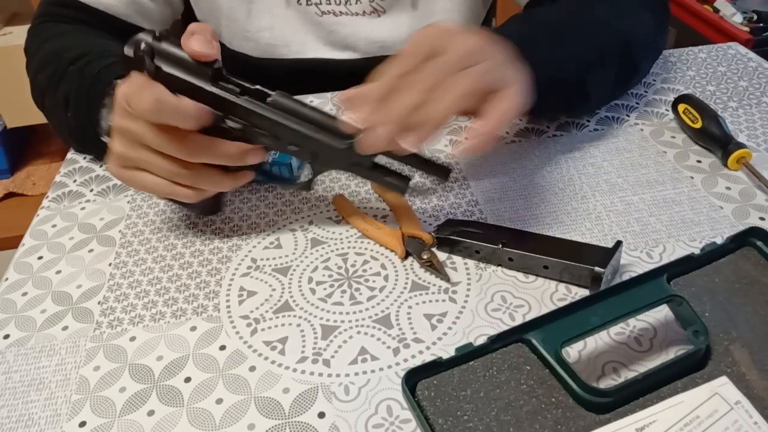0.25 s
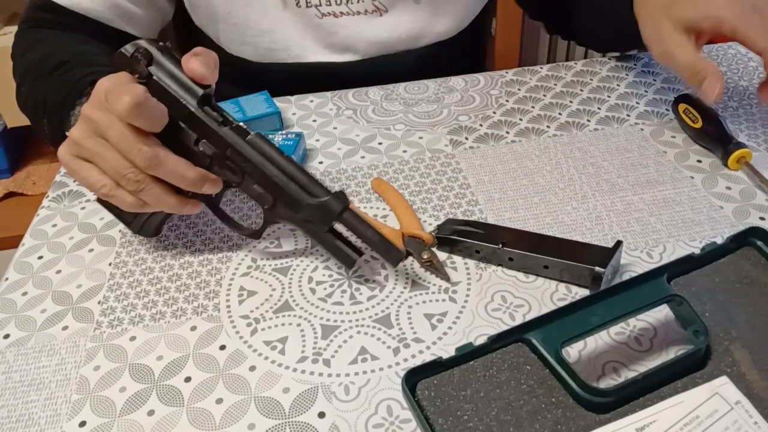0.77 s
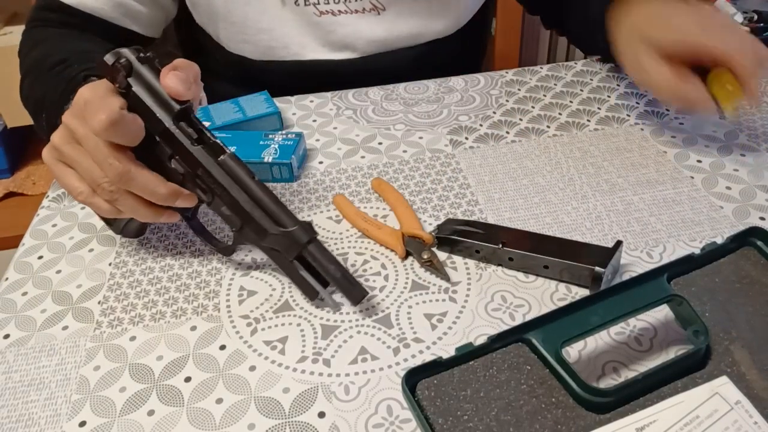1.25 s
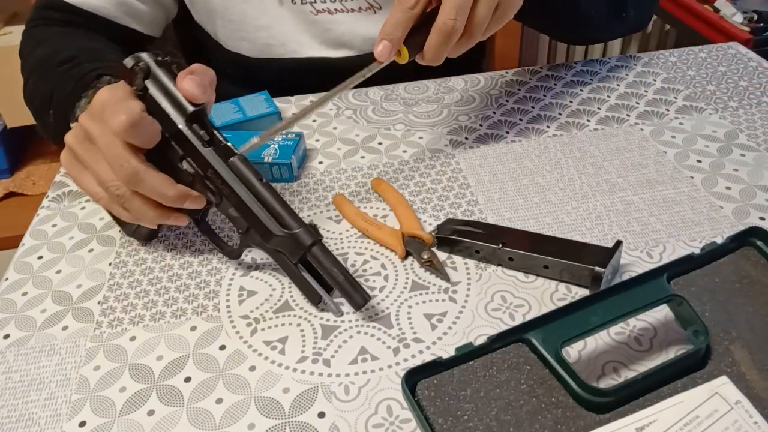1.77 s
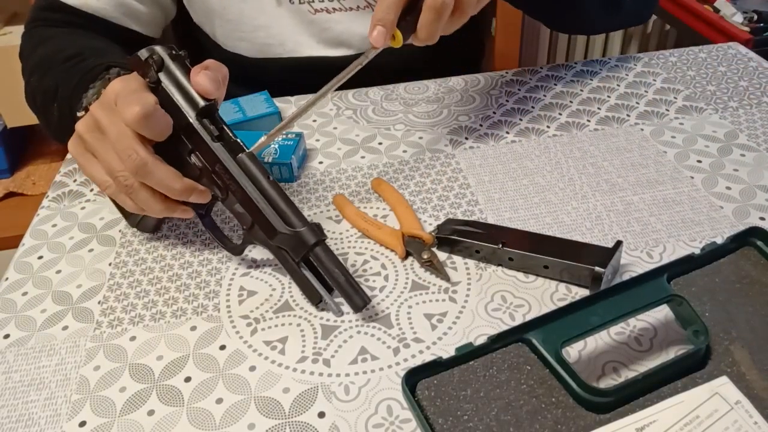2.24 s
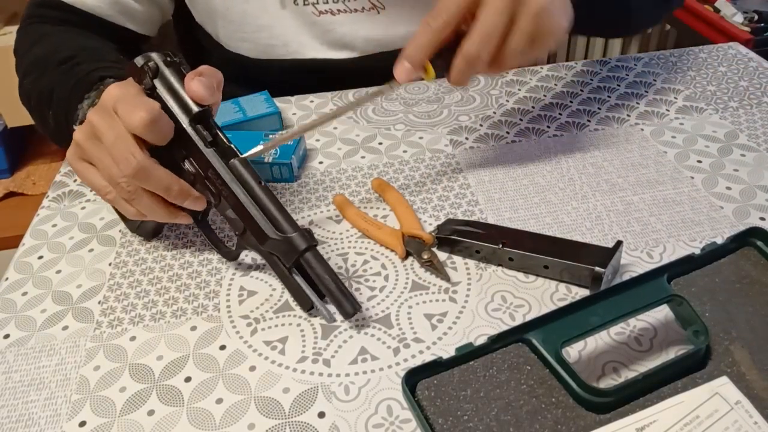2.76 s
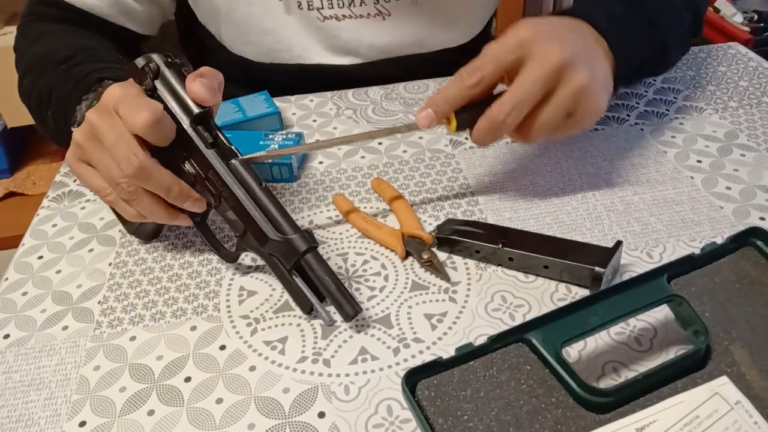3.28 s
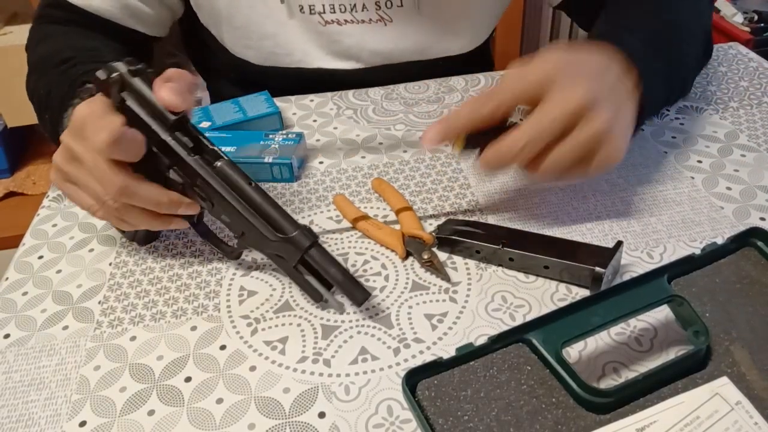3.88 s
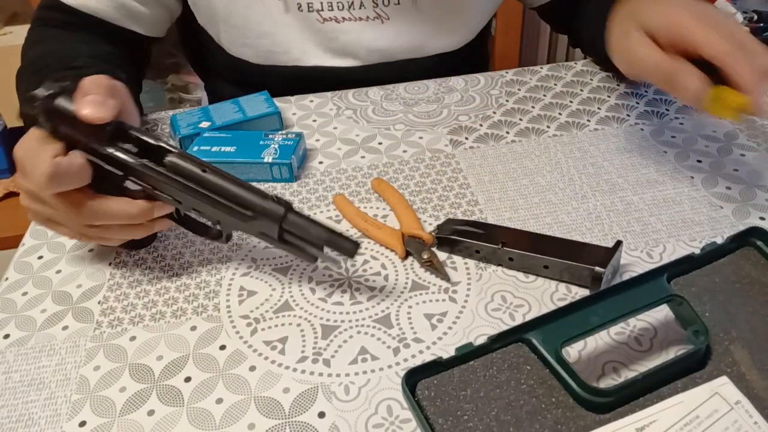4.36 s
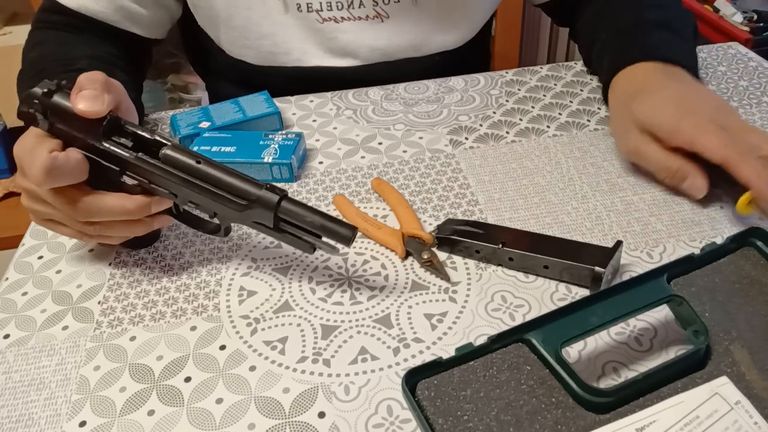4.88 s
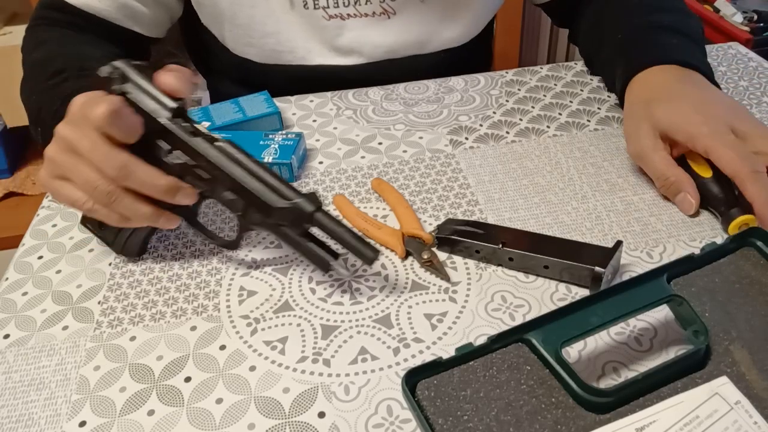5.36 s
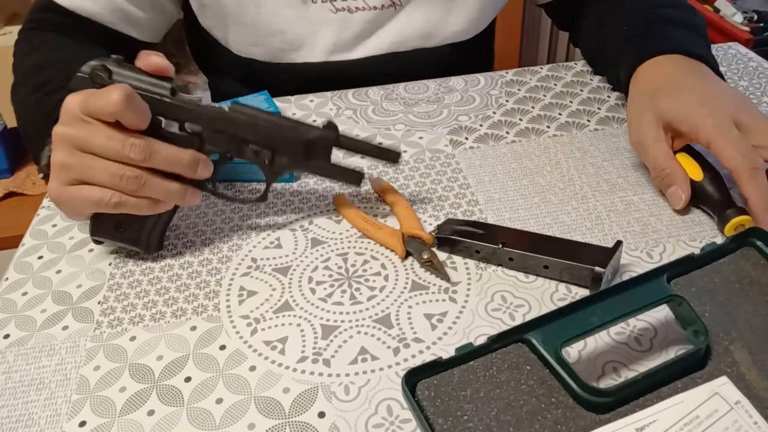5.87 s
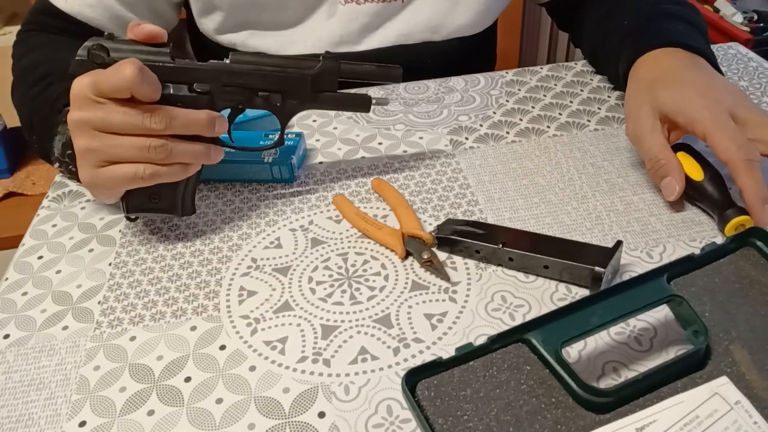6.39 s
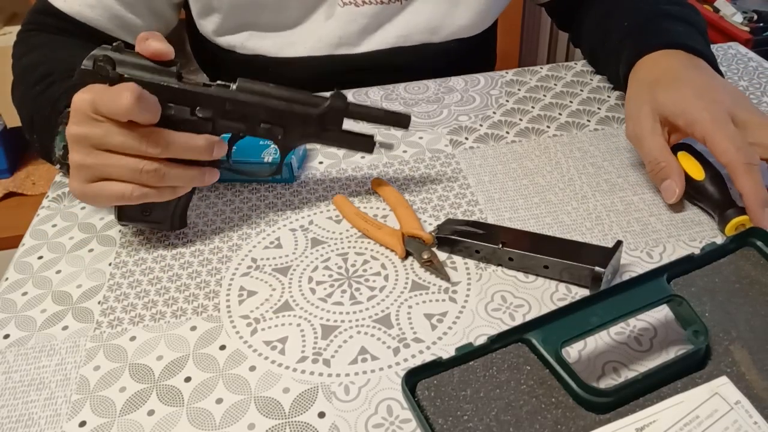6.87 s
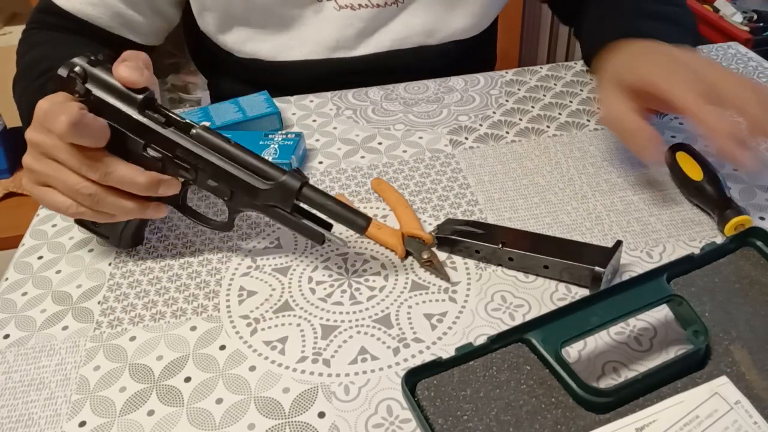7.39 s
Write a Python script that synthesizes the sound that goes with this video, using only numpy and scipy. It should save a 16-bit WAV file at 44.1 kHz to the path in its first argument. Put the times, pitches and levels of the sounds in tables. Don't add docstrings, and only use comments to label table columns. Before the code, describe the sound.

In a small quiet room, a screwdriver ticks and pries at a steel pistol, then a loud metallic clack, loose rattle and thud on a table.

```python
import sys
import numpy as np
from scipy import signal
from scipy.fft import rfft, irfft
from scipy.io import wavfile
from scipy.ndimage import uniform_filter1d

SR = 44100
rng = np.random.default_rng(int(sys.argv[2]) if len(sys.argv) > 2 else 0)


def to_linear_factor(level_db):
    exponent = np.asarray(level_db, float) / 20
    return 10 ** exponent


def dump(signal):
    limited = np.clip(np.atleast_2d(signal).T, -1, 1)
    pcm = np.round(limited * 32767).astype(np.int16)
    wavfile.write(sys.argv[1], SR, pcm)


N = 336483

# frequency in Hz, left-right likeness of diffuse sound from 0 to 1.
LIKENESS = [(60, 1), (120, 0.85), (240, 0.75), (480, .48), (950, 0.025), (1900, 0.0032)]
# frequency in Hz, time for the room tail to fall 60 dB in seconds.
ROOM_T60 = [(100, 1), (300, 0.36), (1000, 0.35), (3000, 0.31), (6000, 0.3), (7800, 0.34), (10000, 0.12)]
# mode frequency in Hz, width in Hz.
RUMBLE_MODES = [(88, 13), (132, 14)]

# frequency in Hz, level in dB per Hz.
AIR_TONE = [(15, -70), (28, -43), (45, -19.5), (100, -0.5), (300, -6.5), (450, -10), (800, -12.5),
            (1500, -18), (2300, -17), (4200, -34), (5600, -40), (6800, -34.5), (8000, -53), (15500, -46.5)]
RUSTLE_TONE = [(2500, -14), (3500, -3.5), (5000, -6), (6600, 2), (7300, -2), (8060, -22), (10500, -42.5)]
STIR_TONE = [(150, -10.5), (300, 1.5), (700, 6.5), (1300, -3.5), (3000, -36.5)]
SCUFF_TONE = [(700, -18.5), (1500, 1.5), (2300, 1.5), (3300, -11), (4500, -18.5), (8000, -46)]

# start in seconds, length in seconds, level in dB.
LOW_SWELLS = [(.4, 0.55, -79), (1.15, 0.71, -75.5), (2.2, 0.63, -71.5), (2.9, 1.04, -69), (4.9, .55, -71),
              (7.1, 0.37, -80.5)]
HIGH_SWELLS = [(.7, 0.49, -74.5), (1.7, 0.72, -71.5), (2.8, 0.18, -72), (3.702, .55, -71), (5, 0.51, -62.5),
               (5.6, 0.69, -77), (6.42, .8, -66.5), (7.42, 0.43, -66.5)]
RUSTLES = [(-.1, 0.49, -100.5), (0.392, 0.46, -84), (1.1, 0.53, -94.5), (2.55, 0.33, -99),
           (4.202, 0.34, -83.5), (5.2, .9, -101.5), (5.2, 2.6, -95.5), (7.51, 0.28, -89.5)]
STIRS = [(.3, 0.65, -69.5), (1.05, 1, -67), (2.5, 0.73, -71), (4.2, 0.38, -76), (4.95, 0.63, -58.5),
         (5.7, 0.81, -70), (6.95, 0.61, -64.5), (7.4, 0.48, -67)]
SCUFFS = [(1.1, 0.66, -66), (3.6, 0.63, -80), (6, 0.26, -67), (6.8, 1.4, -76)]
MOANS = [
    (6.45, 0.27, -76.5),
    (6.75, 0.36, -68.5),
]

# start in seconds, peak in dB, left-right balance in dB, contact in ms, room level in dB.
LATCH = [
    (.001, -44.5, 2.2, 3.6, 1.9),
]
HANDLE = [
    (1.1905, -45.5, 1.1, 4.34, 2.5),
    (1.218, -55, 3.7, 8, -10),
]
TIP = [
    (1.8701, -28, 1.8, 1.63, -6.5),
    (1.8916, -39, 2.0, 1.5, -12),
    (1.9034, -35.5, 0.5, 1.8, -8),
    (1.884, -46, 1.5, 2.1, -10),
    (1.9095, -45.5, 1.5, 2.4, -9),
]
GRIP = [
    (1.9075, -42, -1, 3.63, -2.5),
]
SHAFT = [
    (1.9621, -31, 3.1, 1.24, -6),
    (1.9734, -51, 2.5, 1.1, -6),
    (1.9844, -51, 1.5, 1.5, -7),
]
ELBOW = [
    (1.972, -52, 4.1, 4.3, -9.5),
    (2.888, -45.5, 2.4, 9, -4.5),
    (4.545, -57.5, 2.4, 5.1, -2),
]
TOUCH = [
    (2.1779, -43.5, 10, 1, -7.5),
]
SLIP = [
    (3.8415, -49, 3, 0.49, -15),
]
SEAT = [
    (3.9485, -52.5, 2, 3.8, 1.9),
]
PRY = [
    (3.957, -34, 0.74, 1.793, -6.5),
]
PIN = [
    (3.964, -57, 4, 1.5, -5),
    (3.9748, -53, 4, 1.5, -5),
    (3.9812, -40, 6.9, 2.004, -11),
]
NUDGE = [
    (4.993, -24, 11, 1.9, -5.5),
    (5.015, -44.5, 6, 2.2, -9),
]
CLACK = [
    (5.1, -8.5, 4.5, 1.8, -6),
]
RATTLE = [(5.111, -24.5, 5, 3.3, -2), (5.121, -24, 10, 2.6, -10.5), (5.131, -25, 1, 1.2, -5.5),
          (5.139, -29.5, 0.5, 1.3, -4.5), (5.158, -19, -2, 2.36, -7.5), (5.167, -32.5, 10, 2.7, 2.5),
          (5.18, -23.5, 4.5, 1.52, 0), (5.188, -32, 9, 1.5, -5), (5.198, -28, 4, 1.44, -9)]
THUD = [
    (5.2642, -12.5, 1.4, 1.38, -6),
    (5.27, -21, 1.5, 2.9, -10),
    (5.28, -23, 1.0, 1.1, -9),
    (5.286, -27.5, 1.02, 4.3, -3),
]
LEVER = [
    (6.017, -28, -0.44, 1.2, -4),
]

# start in seconds, peak in dB, contact in ms.
BUMPS = [(0.95, -68, 11), (3.318, -61, 5.1), (3.818, -62, 9.4), (4.309, -67.5, 37), (4.788, -62, 12),
         (5.799, -59, 15), (5.839, -66, 11), (6.235, -60, 20), (6.277, -57.5, 28), (6.44, -57.5, 14),
         (7.589, -67.5, 19)]
SCRAPES = [
    (1.197, -59, 4.6),
    (1.212, -64, 42),
    (1.262, -68, 57),
    (3.575, -74.5, 29),
]
# start in seconds, peak in dB.
TICKS = [(0.2735, -74), (1.1817, -68), (2.604, -69.5), (2.6243, -71), (2.6504, -63), (2.7195, -72),
         (2.8799, -74), (2.974, -69), (5.4396, -71), (5.455, -67), (5.567, -69)]
# first slip in seconds, last slip in seconds, peak in dB.
CREEPS = [(5.622, 5.732, -74), (5.8533, 5.9065, -71), (6.1945, 6.2567, -74), (6.6153, 6.864, -71.5),
          (6.9812, 7.1079, -73)]
# start in seconds, pitch in Hz, level in dB, length in ms.
SQUEAKS = [
    (6.383, 3124, -55, 6),
    (6.443, 2882, -48.5, 8.7),
]
# level in dB of the squeak's successive harmonics, the fundamental first.
SQUEAK_OVERTONES_DB = [0.5, -12.5, -32.5]

# frequency in Hz, level in dB per Hz.
LATCH_TONE = [(710, -52), (1200, -44.5), (1520, -19), (1860, -21), (2150, -7.5), (2500, -10), (3020, -3),
              (3280, -6.5), (4920, -13), (6660, -7.5), (8060, -26), (10500, -25), (17700, -120)]
TICK_TONE = [(2500, -25), (4800, -7), (6000, -2.5), (6900, 13.5), (7600, -10), (8600, -15.5),
             (12000, -50.5)]
BUMP_TONE = [(100, -18), (220, 0.5), (330, 0), (550, -1), (900, -14.5), (2000, -40), (4000, -61.5)]
HANDLE_TONE = [(60, -29), (100, -6), (240, -10), (340, -0.5), (460, 1.5), (650, -7), (820, -2.5),
               (1280, -12.5), (2200, -26), (4000, -61)]
SCRAPE_TONE = [(1200, -23), (2200, 6), (3300, 0.5), (5000, -5.5), (6700, -0.5), (7600, -9), (8300, -26)]
TIP_TONE = [(410, -13), (700, -12), (895, -28), (1850, -8.5), (2130, -11), (2730, -5.5), (3210, -16),
            (3450, -5.5), (3710, -10.5), (6240, -9.5), (6840, -13), (8060, -27), (10500, -62),
            (17700, -120)]
GRIP_TONE = [(120, -37), (300, -27), (570, -2.5), (680, -6), (790, -3), (1160, -17), (1900, -13),
             (3200, -25), (5000, -67)]
SHAFT_TONE = [(710, -25), (1200, -15), (1650, -11), (2060, -1.5), (2480, -11), (2640, -6.5), (3170, -10.5),
              (3780, 0), (4160, -14), (4610, -0.5), (5040, -9), (5540, 0.5), (5910, -16), (6400, 3),
              (8060, -27.5), (10500, -32), (17700, -120)]
ELBOW_TONE = [(24, -47.5), (45, -18), (110, -6), (175, 2), (275, -13.5), (370, -12), (500, -31.5),
              (900, -65)]
TOUCH_TONE = [(880, -49), (1500, -19), (2270, 2), (2580, -18), (2810, -5), (4300, -4), (5030, 1),
              (5790, -6), (7000, 1), (8060, -37), (10500, -61), (17700, -120)]
SEAT_TONE = [(300, -24), (700, -10), (900, 11), (1150, -15), (2500, -59)]
PRY_TONE = [(100, -5), (200, -0.5), (550, -1.5), (1100, -4.5), (1800, -3.5), (2700, -8.5), (3300, -12),
            (3700, -11), (4100, -13.5), (4700, -23), (6800, -22), (8100, -29), (10000, -69)]
PIN_TONE = [(470, -25), (800, -5), (1250, -27), (1500, -6), (2690, -8), (3900, -19), (4600, -7.5),
            (5340, -9), (5820, -21), (6350, -7), (8000, -33), (10400, -60), (17600, -120)]
NUDGE_TONE = [(47, -34.5), (80, -11), (315, -7), (520, -8.5), (573, -16), (668, -9), (965, 0), (1310, -9),
              (1530, -5.5), (3070, -14.5), (5070, -31), (6520, -28.5), (8060, -53), (10500, -87),
              (17700, -120)]
CLACK_TONE = [(47, -51.5), (80, -23.5), (231, -10), (530, -21.5), (751, -7), (1170, -9.5), (1340, -16),
              (1720, -3.5), (2580, -12), (3190, -21.5), (3510, -14.5), (4350, -28), (6520, -20),
              (7610, -36), (8060, -65.5), (10500, -99), (17700, -120)]
RATTLE_TONE = [(80, -24), (231, -9), (530, -19), (780, -2.5), (1300, -13), (1800, -5.5), (2600, -11.5),
               (3200, -23.5), (3700, -19), (4400, -33.5), (6500, -32), (7600, -41.5), (8060, -66),
               (10500, -99)]
THUD_TONE = [(24, -52.5), (40, -27), (86, -15), (140, -22), (232, -3), (344, -12.5), (431, -1.5), (638, -7),
             (783, -1), (981, -4.5), (1180, -5), (1600, -13), (3500, -41), (4550, -78), (7700, -120)]
LEVER_TONE = [(88, -33), (150, -25), (307, -2.5), (415, -11), (466, -6), (863, -3.5), (1110, -10),
              (1250, -5), (1650, -10), (2350, -3), (6490, -14.5), (8060, -25), (10500, -64), (17700, -120)]

# frequency in Hz, width in Hz, level over the colour in dB.
TIP_RINGS = [(1700, 200, 2), (2720, 150, 5), (3430, 130, 4.4), (4400, 170, 4), (6960, 230, 3)]
SHAFT_RINGS = [(2710, 190, 10), (4640, 120, -1), (6570, 120, 7.5), (8200, 45, 8)]
TOUCH_RINGS = [(1870, 90, 5), (2310, 100, 5), (4150, 93, 5), (5000, 160, 6.8)]
PRY_RINGS = [(484, 180, 1.8), (1840, 100, 4), (3240, 180, 6), (4100, 190, 6.6)]
PIN_RINGS = [(4560, 150, 4), (6380, 150, 4.9)]
NUDGE_RINGS = [(958, 92, 3), (1500, 98, 4), (2580, 81, 2), (3020, 110, 2)]
CLACK_RINGS = [(785, 50, 1), (974, 70, 3.5), (1760, 54, 6.5), (2000, 110, 2.5), (2540, 70, 0.5),
               (2810, 140, 5.5), (3610, 180, -0.5), (5400, 280, -1)]
THUD_RINGS = [(464, 68, 3.3), (855, 45, 4), (1223, 56, 2), (1800, 90, 3)]
LEVER_RINGS = [(340, 64, 2.6), (780, 220, 3.4), (1960, 140, 6.3), (2600, 110, 4), (3950, 260, 4.9),
               (5100, 220, 2.1)]


def evened(x):
    return x / np.sqrt(np.mean(x ** 2) + 1e-20)


def read(points, hz):
    f, value = np.transpose(points)
    return np.interp(np.log(hz + 1), np.log(f + 1), value)


def add(mix, s, sound):
    part = mix[..., max(round(s * SR), 0):][..., :sound.shape[-1]]
    part += sound[..., :part.shape[-1]]


def pair(shape, hz):
    a, b, c, d = rng.standard_normal((*shape, 4)).T
    left, other = a + 1j * b, c + 1j * d
    same = np.clip(read(LIKENESS, hz), -1, 1)[:, None]
    return np.array([left, same * left + np.sqrt(1 - same ** 2) * other])


def noise(tone, patchy_db):
    hz, shape = np.fft.rfftfreq(1024, 1 / SR), (N // 256 + 5, 513)
    patches = uniform_filter1d(rng.standard_normal(shape), 10, 0)
    patches = evened(uniform_filter1d(patches, 10, 1)).T
    patches = patches * (hz[:, None] < SR / 5.5)
    z = pair(shape, hz) * to_linear_factor(read(tone, hz)[:, None] + patchy_db * patches)
    return evened(signal.istft(z, nperseg=1024, noverlap=768)[1][:, :N])


def swells(rows, rest_db, edge_s):
    t, gain = np.arange(N) / SR, to_linear_factor(rest_db)
    for s, length, db in rows:
        edge = np.clip(np.minimum(t - s, s + length - t) / min(edge_s, length / 2), 0, 1)
        gain = gain + to_linear_factor(db) * np.sin(np.pi / 2 * edge) ** 2
    return gain


def resonate(x, hz, width):
    turn = np.exp(2j * np.pi * np.cumsum(hz * np.ones(x.shape[-1])) / SR)
    r = np.exp(-np.pi * width / SR)
    return 2 * (turn * signal.lfilter([1 - r], [1, -r], x / turn)).real


def knock_shape(tone, rings, sparkle_db):
    hz = abs(np.fft.fftfreq(4096, 1 / SR))
    lift = 1 + sum(to_linear_factor(db) / np.hypot(1, 2 * (hz - f) / width) for f, width, db in rings)
    shelf = to_linear_factor(sparkle_db) / np.hypot(1, (8000 / (hz + 1)) ** 6) / np.hypot(1, (hz / 15300) ** 30)
    log_gain = np.log(to_linear_factor(read(tone, hz)) * lift + shelf + to_linear_factor(-100))
    response = np.fft.ifft(np.exp(np.conj(signal.hilbert(log_gain)))).real
    return response[:2048] * np.hanning(4096)[2048:]


def add_knocks(near, send, rows, tone, lead_ms, sparkle_db, rings=()):
    t, body = np.arange(4000) / SR, knock_shape(tone, rings, sparkle_db)
    hz = np.fft.rfftfreq(len(t), 1 / SR)
    apart = 1 / np.hypot(1, (400 / (hz + 1)) ** 2)
    grit = rng.standard_normal((len(rows), 3, len(t)))
    for (s, db, pan_db, ms, wet_db), (common, left, right) in zip(rows, grit):
        u = 1000 * t / ms
        shape = np.exp(-u) * (1 - np.exp(-u / 0.36))
        burst = rfft(shape * common) + apart * rfft(shape * np.array([1.2 * left, 0.61 * right]))
        burst = np.sqrt(shape) * irfft(burst / (abs(burst) + 1e-9) ** .75)
        strike = to_linear_factor(0.5) * np.exp(-ms / 2.4) * np.linalg.norm(burst[0]) * (np.arange(len(t)) == shape.argmax())
        ring = signal.fftconvolve(burst + strike, body[None], axes=1)
        ring = to_linear_factor(db + 3.0) * ring / abs(ring).max()
        add(near[0], s + .0007 - lead_ms / 2000, ring[0] * to_linear_factor(pan_db / 2))
        add(near[1], s + 0.00065 + lead_ms / 2000, ring[1] / to_linear_factor(pan_db / 2))
        add(send, s, body * np.linalg.norm(ring[0]) / np.linalg.norm(body) * to_linear_factor(wet_db))


def placed(rows, pan_db, wet_db):
    return [(s, db, pan_db, ms, wet_db) for s, db, ms in rows]


def still_air():
    return to_linear_factor(-68.5) * noise(AIR_TONE, patchy_db=2.5)


def house_rumble(wide):
    low = swells(LOW_SWELLS, rest_db=-88, edge_s=.25)
    high = swells(HIGH_SWELLS, rest_db=-83.5, edge_s=.18)
    return sum(gain * evened(resonate(resonate(wide, hz, width), hz, 2 * width))
               for gain, (hz, width) in zip((low, high), RUMBLE_MODES))


def sleeve_rustle():
    return to_linear_factor(4.5) * swells(RUSTLES, rest_db=-101, edge_s=.1) * noise(RUSTLE_TONE, patchy_db=3.0)


def latch(near, send):
    add_knocks(near, send, LATCH, LATCH_TONE, .07, -42)


def ticks(near, send):
    gap_s, spread_db = .06, 1.5
    slips = [(s, db) for first, last, db in CREEPS
             for s in np.linspace(first, last, round((last - first) / gap_s) + 1)]
    spread = spread_db * rng.standard_normal(len(slips))
    rows = list(TICKS) + [(s, db + d) for (s, db), d in zip(slips, spread)]
    rows = placed([(s, db, .6) for s, db in rows], pan_db=-4.0, wet_db=-27.0)
    add_knocks(near, send, rows, TICK_TONE, .026, -39)


def arm_stir():
    return to_linear_factor(-8.5) * swells(STIRS, rest_db=-80, edge_s=0.24) * noise(STIR_TONE, patchy_db=4.0)


def bumps(near, send):
    add_knocks(near, send, placed(BUMPS, pan_db=1.0, wet_db=-2.5), BUMP_TONE, .05, -90)


def finger_scuff():
    return to_linear_factor(-6.5) * swells(SCUFFS, rest_db=-87, edge_s=0.35) * noise(SCUFF_TONE, patchy_db=5.0)


def screwdriver_handle(near, send):
    add_knocks(near, send, HANDLE, HANDLE_TONE, .01, -75)
    add_knocks(near, send, placed(SCRAPES, pan_db=2.0, wet_db=0.0), SCRAPE_TONE, .05, -36)


def screwdriver_prods(near, send):
    add_knocks(near, send, TIP, TIP_TONE, .07, -47, TIP_RINGS)
    add_knocks(near, send, GRIP, GRIP_TONE, .01, -70)
    add_knocks(near, send, SHAFT, SHAFT_TONE, .048, -30, SHAFT_RINGS)
    add_knocks(near, send, TOUCH, TOUCH_TONE, .07, -46, TOUCH_RINGS)


def elbow(near, send):
    add_knocks(near, send, ELBOW, ELBOW_TONE, .2, -90)


def prying(near, send):
    add_knocks(near, send, SLIP, TICK_TONE, .11, -44)
    add_knocks(near, send, SEAT, SEAT_TONE, .1, -80)
    add_knocks(near, send, PRY, PRY_TONE, .2, -76, PRY_RINGS)
    add_knocks(near, send, PIN, PIN_TONE, .13, -46, PIN_RINGS)


def pistol_turned(near, send):
    add_knocks(near, send, NUDGE, NUDGE_TONE, .29, -72, NUDGE_RINGS)
    add_knocks(near, send, CLACK, CLACK_TONE, .27, -78, CLACK_RINGS)
    add_knocks(near, send, RATTLE, RATTLE_TONE, .27, -90, CLACK_RINGS)
    add_knocks(near, send, THUD, THUD_TONE, .29, -78, THUD_RINGS)


def lever(near, send):
    add_knocks(near, send, LEVER, LEVER_TONE, -.2, -54, LEVER_RINGS)


def squeaks():
    out = np.zeros(N)
    for s, hz, db, ms in SQUEAKS:
        u = np.linspace(0, 1, round(ms * SR / 1000))
        turns = np.cumsum(hz * (1.025 - 0.059 * u)) / SR
        tones = sum(to_linear_factor(g) * np.sin(2 * np.pi * k * turns) for k, g in enumerate(SQUEAK_OVERTONES_DB, 1))
        add(out, s, to_linear_factor(db) * tones * np.sin(np.pi * u))
    return out


def far_moan(wide):
    hz = 573 + 88 * np.maximum(np.arange(N) / SR - 6.45, 0)
    return swells(MOANS, rest_db=-110, edge_s=0.16) * evened(resonate(resonate(wide, hz, 28), hz, 30))


def background():
    wide = noise([(20, -0.5), (2000, -0.5), (4000, -40.5)], patchy_db=-0.5)
    diffuse = still_air() + sleeve_rustle() + arm_stir() + finger_scuff() + far_moan(wide)
    return diffuse * to_linear_factor([[.8], [-.8]]) + house_rumble(wide) * to_linear_factor([[1.3], [-1.3]])


def room(x):
    hz, t = np.fft.rfftfreq(256, 1 / SR), np.arange(360) * 64 / SR
    z = pair((len(t), len(hz)), hz) * to_linear_factor(-60 * t / read(ROOM_T60, hz)[:, None])
    tail = signal.istft(z, nperseg=256, noverlap=192)[1]
    t = np.arange(tail.shape[1]) / SR
    lumps = evened(uniform_filter1d(rng.standard_normal(len(t)), 90))
    lumps = to_linear_factor(1.8 * lumps * np.exp(-t / .06))
    tail = tail * lumps * (1 - np.exp(-np.maximum(t - .004, 0) / 0.0039))
    return signal.fftconvolve(x[None], tail / np.linalg.norm(tail[0]), axes=1)[:, :N]


def scene():
    near, send = np.zeros((2, N)), np.zeros(N)
    for source in (latch, ticks, bumps, screwdriver_handle, screwdriver_prods, elbow,
                   prying, pistol_turned, lever):
        source(near, send)
    far = squeaks()
    direct = near + far * to_linear_factor([[1.5], [-1.5]])
    walls = room(send + to_linear_factor(5.0) * far) * to_linear_factor([[.8], [-.8]])
    return direct + walls + background()


def low_pass(x):
    return signal.sosfilt(signal.butter(12, 15800, fs=SR, output="sos"), x)


def record(dry):
    ceiling = 0.93
    return low_pass(ceiling * np.tanh(dry / ceiling))


dry = scene()
out = record(dry)
dump(out)
```